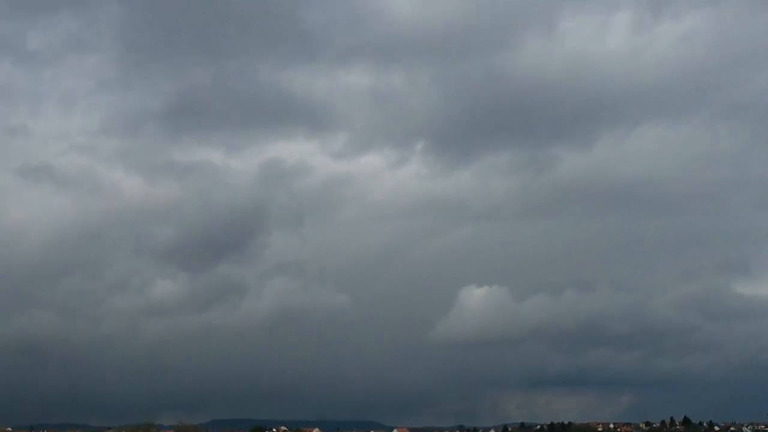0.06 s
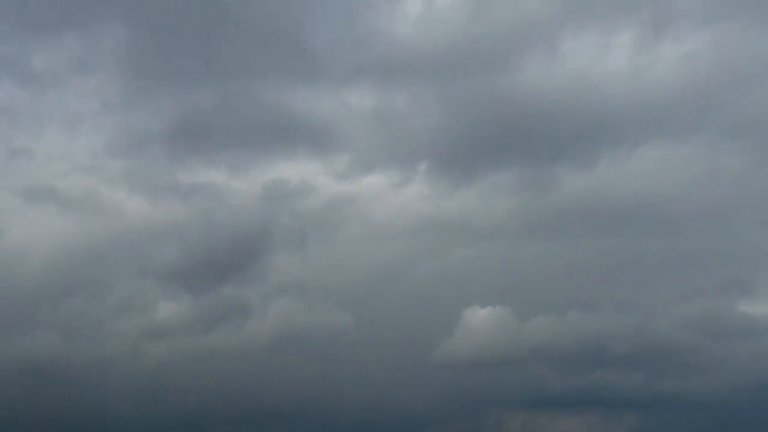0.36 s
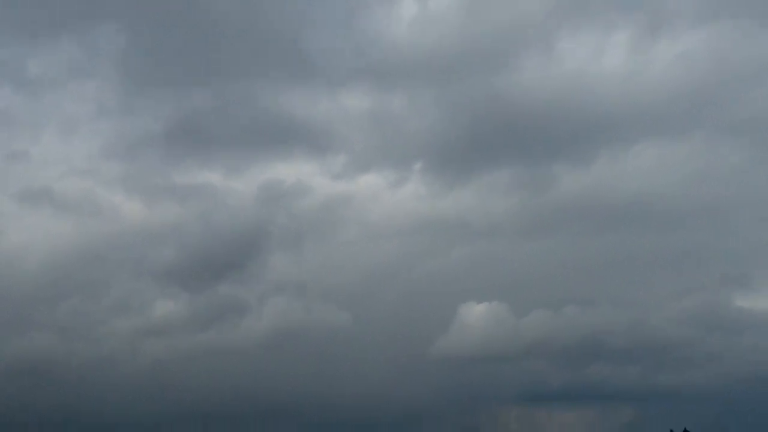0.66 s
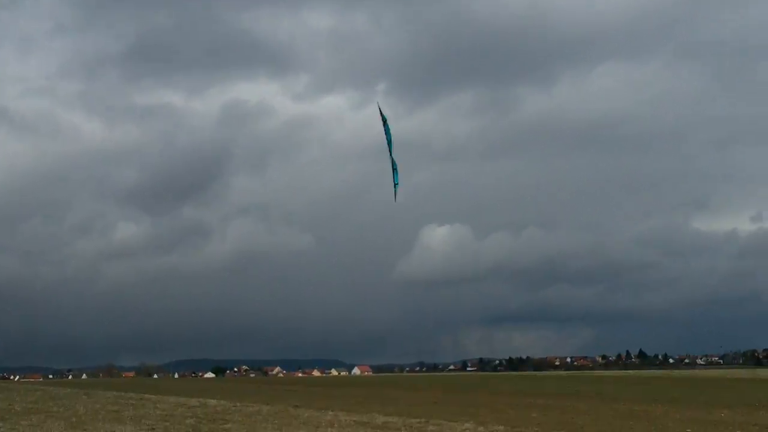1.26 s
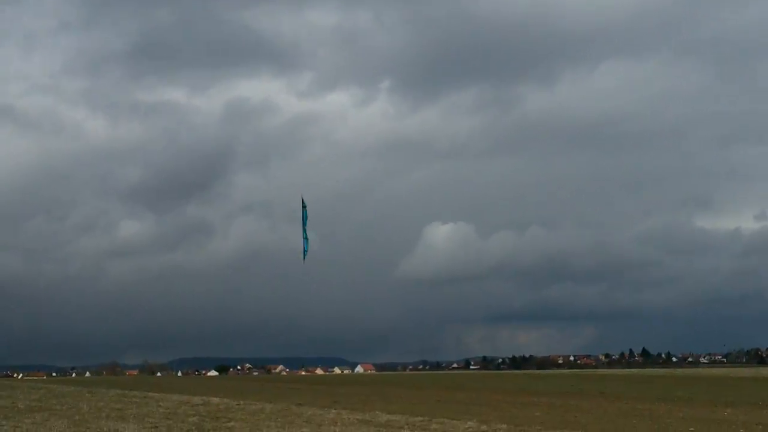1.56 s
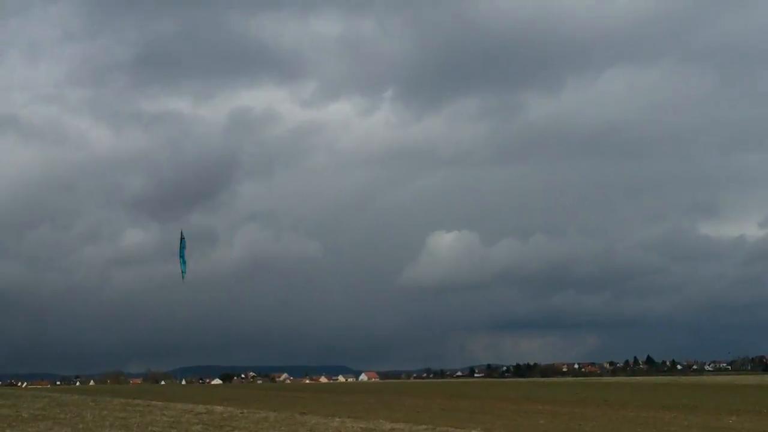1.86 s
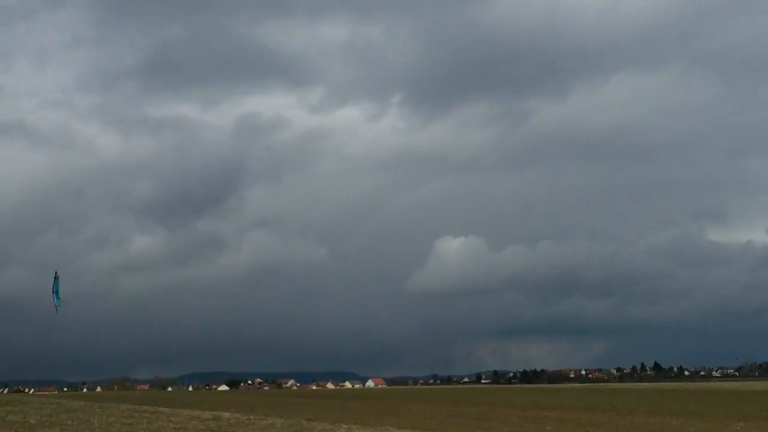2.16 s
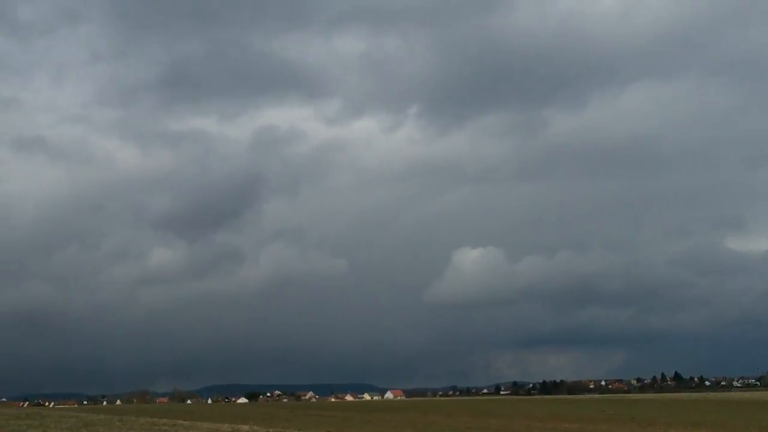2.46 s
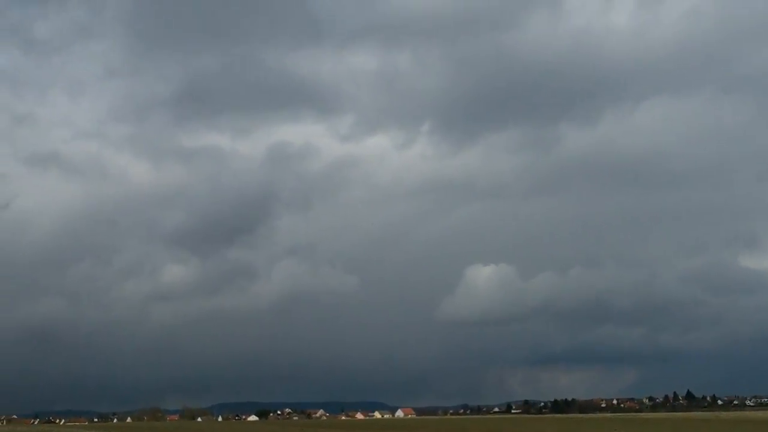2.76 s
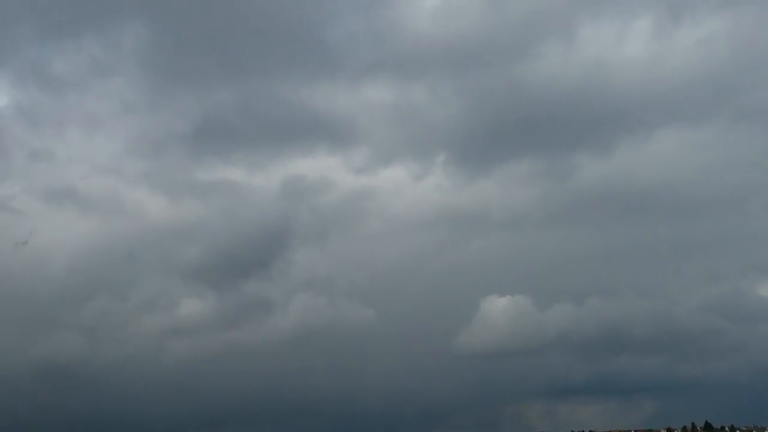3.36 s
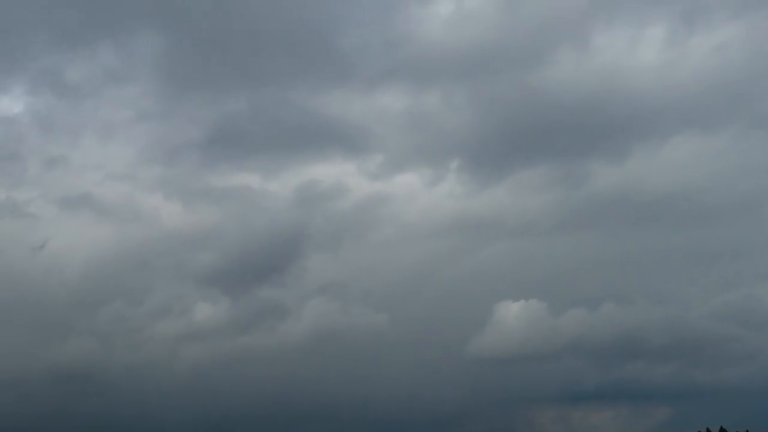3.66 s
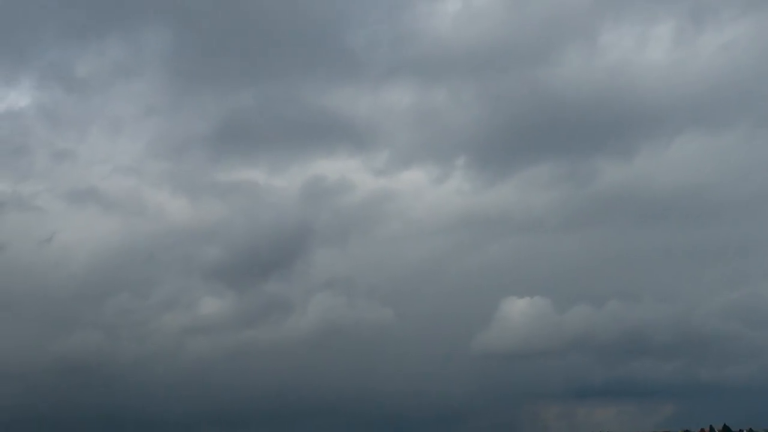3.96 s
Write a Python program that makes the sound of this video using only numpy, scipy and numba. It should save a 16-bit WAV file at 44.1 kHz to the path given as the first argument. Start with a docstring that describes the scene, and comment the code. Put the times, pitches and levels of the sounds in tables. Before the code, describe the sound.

Gusty wind rumbles and thumps on the microphone, with a kite's lines faintly whistling behind.

```python
"""Gusty wind buffets a small camera's microphone in an open field; a stunt kite sweeps overhead.
Eddies rumble, flutter, puff and thump on the microphone. Behind them air hisses, the sail swishes
and the taut kite lines whistle, their pitch following airspeed.
The camera's limiter steps down on big thumps with a tiny buzz, ducking the hiss."""
import sys
import numpy as np
from scipy import signal
from scipy.fft import rfft, irfft
from scipy.io import wavfile
from numba import njit

SR = 44100
rng = np.random.default_rng(int(sys.argv[2]) if len(sys.argv) > 2 else 0)


def generate_wav(sig):
    """Save sig (samples, or channels by samples) to the path in sys.argv[1] as 16-bit PCM at SR."""
    pcm = np.round(np.clip(np.atleast_2d(sig).T, -1, 1) * 32767).astype(np.int16)
    wavfile.write(sys.argv[1], SR, pcm)


N = 176400
TIME_S = np.arange(N) / SR
FREQ_HZ = np.maximum(np.arange(N // 2 + 1) * SR / N, 1)


def undb(db):
    """Decibels to gain."""
    return 10 ** (np.asarray(db) / 20)


def unit(x):
    """Scale to rms 1."""
    return x / np.sqrt(np.mean(x ** 2))


def curve(rows, column=1):
    """One column of a time table, at every sample."""
    rows = np.array(rows)
    return np.interp(TIME_S, rows[:, 0], rows[:, column])


def bell(at_s, half_s):
    """Gaussian pulse: 1 at its centre, 1/e a half length away."""
    return np.exp(-((TIME_S - at_s) / half_s) ** 2)


def colour(points):
    """Gain per frequency from (Hz, dB) points."""
    hz, db = np.array(points).T
    return undb(np.interp(np.log(FREQ_HZ), np.log(hz), db))


def noise(gain):
    """Noise of rms 1, shaped by a gain per frequency."""
    return unit(irfft(rfft(rng.standard_normal(N)) * gain, N))


def walk(rate_hz):
    """Smooth random drift of rms 1."""
    return noise(np.exp(-(FREQ_HZ / rate_hz) ** 2))


# Air hiss spectrum (frequency [Hz], relative density [dB])
RUSH_SPECTRUM = [(200, 5), (700, -1.5), (1200, 2.5), (2700, 1), (3800, -3), (5500, 2), (6500, 1),
                 (8000, -13), (10000, -9.5), (15000, -20.5)]
# Air hiss envelope (time [s], level [dB])
RUSH_LEVELS = [(0, -54), (.4, -57), (.7, -57), (1.0, -54.5), (1.4, -54), (1.9, -50.5), (2.3, -53),
               (2.55, -49.5), (2.8, -53.5), (3.25, -58.5), (3.6, -52.5), (3.9, -50)]


def air_rush():
    """Broad hiss of air over sail and field, swelling as the kite dives past."""
    return noise(colour(RUSH_SPECTRUM)) * undb(curve(RUSH_LEVELS))


# Sail swishes (time [s], level [dB], half length [s])
SAIL_SWISHES = [(1.967, -55.5, 0.19), (2.27, -50.5, 0.046), (2.538, -51.5, 0.097)]


def sail(centre_hz=2530, half_width_hz=920):
    """Air swishes softly over the sail as it dives and turns."""
    swell = sum(undb(db) * bell(at_s, half_s) for at_s, db, half_s in SAIL_SWISHES)
    return swell * noise(1 / (1 + ((FREQ_HZ - centre_hz) / half_width_hz) ** 2))


def aeolian_tone(phase, width_hz, skirt_db=1, flicker_db=1.1):
    """Vortex tone: a narrow core in a skirt smeared by airspeed varying along the line."""
    core, skirt = (np.exp(-(FREQ_HZ / (share * width_hz)) ** 2 / 2) for share in (.3, 1.3))
    tone = sum((noise(core) + undb(skirt_db) * noise(skirt)) * wave(phase) for wave in (np.cos, np.sin))
    return unit(tone) * undb(flicker_db * walk(rate_hz=12))


# Line whistle (time [s], thinnest line's pitch [Hz], its level [dB], thicker lines' gain [dB])
LINE_WHISTLE = [(0, 6400, -46.5, -57), (.2, 6050, -47.5, -58.5), (.42, 5460, -50.5, -59.5),
                (.6, 6010, -53.5, -68), (.72, 5870, -64, -77), (.82, 5430, -53.5, -65.5),
                (.97, 5080, -49, -60), (1.13, 4874, -47.5, -60), (1.28, 5036, -46, -59),
                (1.58, 5220, -53, -68), (1.85, 5845, -60.5, -58), (2.35, 6835, -65, -72),
                (2.92, 6187, -58, -63), (3.1, 5758, -56, -62), (3.19, 5530, -60, -63),
                (3.42, 6080, -55.5, -60), (3.58, 6680, -57.5, -58.5), (3.68, 7300, -56, -54),
                (3.8, 7824, -63, -53.5), (4.0, 7970, -53, -52)]
# Thicker lines and spars (pitch re thinnest line [ratio], nominal half width [Hz], relative level [dB])
THICK_TONES = [(.775, 420, -4), (.626, 190, -2), (.315, 64, -7.5), (.098, 100, -3.5)]


def kite_lines(wobble_share=.011):
    """Taut lines whistle and glide together with airspeed; the thicker, the lower."""
    pitch_hz = curve(LINE_WHISTLE) * (1 + wobble_share * walk(rate_hz=15))
    phase = 2 * np.pi * np.cumsum(pitch_hz) / SR
    thin = aeolian_tone(phase, width_hz=580)
    thick = sum(undb(db) * aeolian_tone(ratio * phase, width_hz) for ratio, width_hz, db in THICK_TONES)
    return thin * undb(curve(LINE_WHISTLE, column=2)) + thick * undb(curve(LINE_WHISTLE, column=3))


# Turbulent puffs (time [s], body level before sputter [dB], decay [s], upper edge [Hz])
PORT_PUFFS = [(.307, -19, 0.0042, 744), (0.567, -26, 0.013, 447), (.886, -16, .012, 850),
              (2.077, -19, 0.006, 690.5), (2.136, -24.5, 0.0083, 670), (2.255, -9, 0.0092, 413),
              (2.526, -21, .013, 700), (2.649, -23.5, .014, 652), (2.692, -26, 0.018, 692),
              (2.763, -21.5, 0.0024, 712), (2.821, -23, 0.012, 625), (2.886, -26.5, 0.0082, 615),
              (2.945, -20, 0.014, 575), (2.979, -26.5, 0.0095, 1540), (3.084, -25, 0.022, 562),
              (3.15, -11.5, .0055, 940), (3.707, -23.5, 0.023, 650), (3.758, -27, 0.049, 457)]


def puffs(attack_s=.004, tilt=.59, crack_db=-1, crack_speed=1.9, sputter_db=3.5):
    """Turbulence flares and sputters at the port; the bright crack dies before the dull body."""
    out = np.zeros(N)
    for at_s, db, decay_s, edge_hz in PORT_PUFFS:
        low_hz, body_hz = .15 * edge_hz, .67 * edge_hz
        rolloff = np.sqrt((1 + (low_hz / FREQ_HZ) ** 6) * (1 + (FREQ_HZ / edge_hz) ** 10))
        band = FREQ_HZ ** -tilt / rolloff
        envelope = np.exp(-np.maximum((at_s - TIME_S) / attack_s, (TIME_S - at_s) / decay_s))
        body = envelope * noise(band / np.sqrt(1 + (FREQ_HZ / body_hz) ** 10))
        crack = undb(crack_db) * envelope ** crack_speed * noise(band)
        out += undb(db) * (body + crack)
    return out * unit(undb(sputter_db * walk(rate_hz=115)))


# Big eddies (time [s], pressure [full scale; + push, - pull], half length [s])
EDDY_THUMPS = [(0.2371, 0.29, 0.0024), (0.2529, -0.31, 0.0028), (0.2906, 0.52, 0.002), (0.473, .26, 0.0031),
               (.727, -0.27, 0.0036), (.738, 0.26, 0.0031), (0.752, 0.48, 0.0017), (.880, -0.3, 0.0011),
               (1.929, .24, .004), (2.036, -0.55, .0036), (2.041, .36, 0.0047), (2.163, 0.82, .0033),
               (2.258, -.64, 0.0022), (2.267, -0.82, .0026), (2.326, .52, 0.0041), (2.334, -0.97, .003),
               (2.341, 1.2, 0.0033), (2.493, .36, 0.0023), (2.597, -.46, 0.0032), (2.617, 0.59, .0026),
               (2.734, -.34, .0044), (3.15, 1.2, .0034), (3.612, 0.65, 0.0033)]


def thumps(rebound_share=.31):
    """Each big eddy pushes or pulls the diaphragm, which then swings back."""
    out = np.zeros(N)
    for at_s, pressure, half_s in EDDY_THUMPS:
        rebound = rebound_share * bell(at_s + 3.1 * half_s, 1.4 * half_s)
        out += pressure * (bell(at_s, half_s) - rebound)
    return out


# Rumble spectrum (frequency [Hz], relative density [dB])
RUMBLE_SPECTRUM = [(12, -7.5), (24, 0), (42, -2.5), (70, -4), (120, -10), (200, -23.5), (400, -45.5),
                   (1000, -67), (5000, -120)]
# Flutter spectrum (frequency [Hz], relative density [dB])
FLUTTER_SPECTRUM = [(50, -8), (120, 0), (210, 1.5), (420, -11), (700, -22), (1200, -33.5), (8000, -99)]
# Gusts, before trim (time [s], rumble level [dB], flutter level [dB])
GUST_LEVELS = [(0, -20.5, -45.5), (.1, -21.5, -43), (.3, -24.5, -33), (.55, -29, -44), (.75, -26, -31.5),
               (1.08, -25.5, -38.5), (1.35, -28.5, -43.5), (1.65, -25.5, -43.5), (1.88, -28, -40),
               (2.05, -17.5, -30), (2.6, -22, -31.5), (3.0, -25, -30.5), (3.25, -27.5, -40.5),
               (3.44, -31.5, -46), (3.58, -17, -33), (3.76, -25, -37), (3.88, -28.5, -47),
               (4.0, -42.5, -58)]
# Brief lulls in the buffeting (time [s])
LULL_TIMES_S = [0.157, 0.961, 1.239, 1.385, 1.566, 1.828, 3.871, 3.97]


def buffeting(rumble_trim_db=.72, flutter_trim_db=-.5, rumble_spread_db=2.2, flutter_spread_db=3.4):
    """Wind on the microphone: deep rumble and patchy flutter of small eddies, following the gusts."""
    eddies = walk(rate_hz=28)
    rumble = unit(noise(colour(RUMBLE_SPECTRUM)) * undb(rumble_spread_db * eddies))
    rumble *= undb(curve(GUST_LEVELS) + rumble_trim_db)
    swept = np.max([bell(at_s, half_s=.011) for at_s, _, _ in EDDY_THUMPS], axis=0)
    rumble *= 1 - .7 * swept  # big eddies sweep the rumble aside
    flutter = unit(noise(colour(FLUTTER_SPECTRUM)) * undb(flutter_spread_db * eddies))
    flutter *= undb(curve(GUST_LEVELS, column=2) + flutter_trim_db)
    lull_db = -10.5 * sum(bell(at_s, half_s=.014) for at_s in LULL_TIMES_S)
    return undb(lull_db) * (rumble + flutter)


def scene():
    """Wind on the microphone in front, the kite behind it; mono."""
    return (buffeting() + thumps() + puffs() + kite_lines() + sail() + air_rush())[None]


@njit
def limiter(x, limit_db, step_db, clock_hz, recover_s):
    """Gain steps down at each clock tick that finds the output too loud, and creeps back."""
    limit, period = 10 ** (limit_db / 20), SR / clock_hz
    y, cut_db, clock = np.empty(len(x)), 0., 0.
    for i in range(len(x)):
        y[i] = x[i] * 10 ** (-cut_db / 20)
        clock += 1
        if clock >= period:
            clock -= period
            if abs(y[i]) > limit:
                cut_db += step_db
        cut_db -= cut_db / (recover_s * SR)
    return y


# Camera response (frequency [Hz], gain [dB])
CAMERA_RESPONSE = [(3, -35), (16, 3.5), (5000, -0.5), (6200, -6.5), (7200, -9), (9500, -5.5), (15500, -6)]
# Dips in that response (frequency [Hz], nominal half width [Hz])
CAMERA_NOTCHES = [(4230, 327), (7950, 720), (8750, 330), (12680, 240)]


def record(dry):
    """Camera: stepping limiter, notched response, steep top cut."""
    limited = limiter(dry[0], limit_db=-12.5, step_db=.75, clock_hz=2405, recover_s=.04)
    response = colour(CAMERA_RESPONSE)
    for hz, width_hz in CAMERA_NOTCHES:
        response *= (1 - 1 / (1 + ((FREQ_HZ - hz) / width_hz) ** 2)) ** .53
    heard = irfft(rfft(limited) * response, N)
    top_cut = signal.ellip(8, .2, 70, 15600, fs=SR, output="sos")
    return signal.sosfilt(top_cut, heard)[None]


dry = scene()
out = record(dry)
generate_wav(out)
```